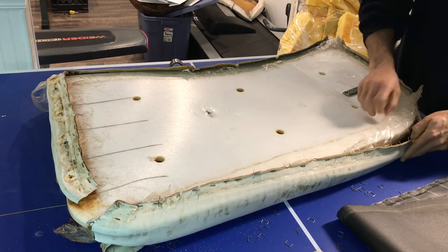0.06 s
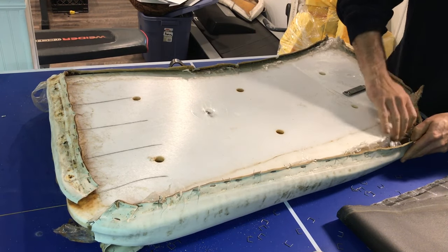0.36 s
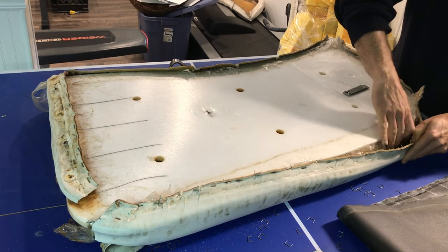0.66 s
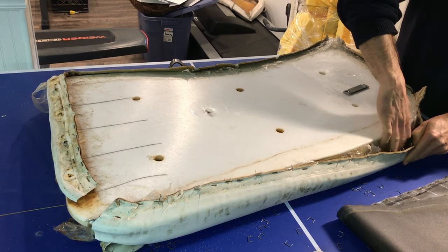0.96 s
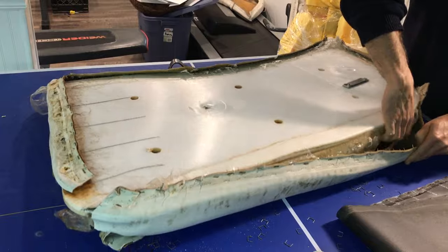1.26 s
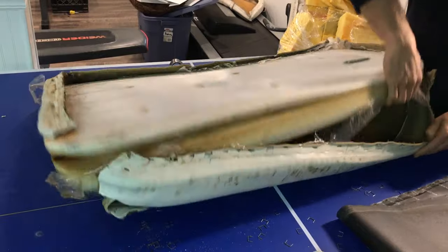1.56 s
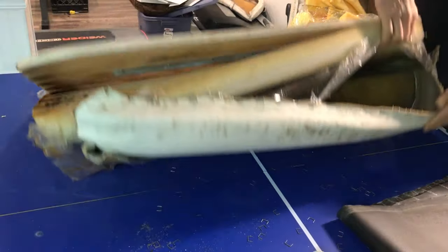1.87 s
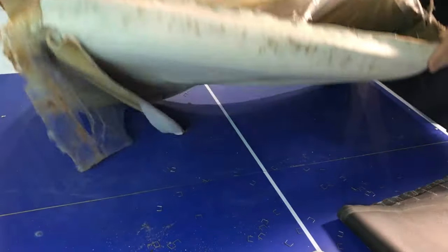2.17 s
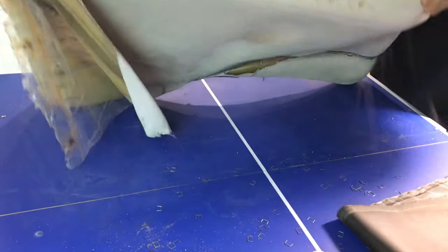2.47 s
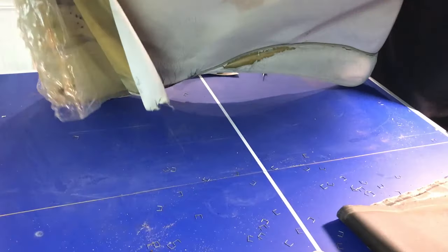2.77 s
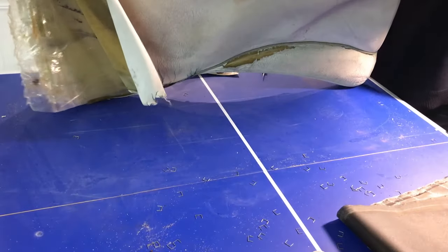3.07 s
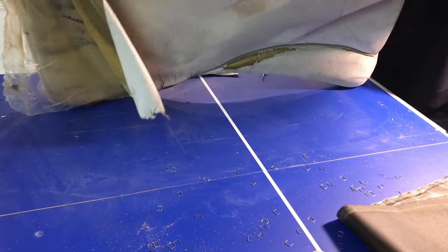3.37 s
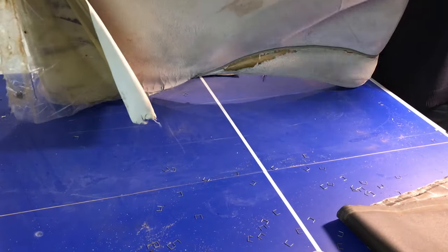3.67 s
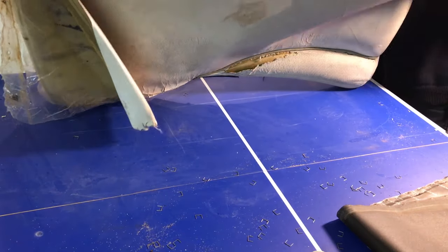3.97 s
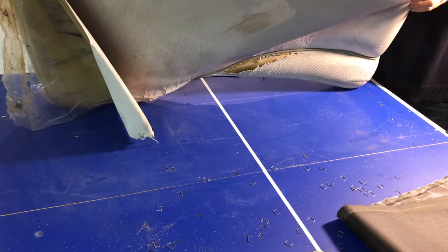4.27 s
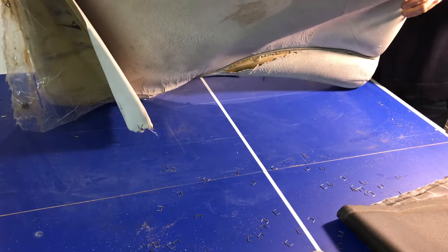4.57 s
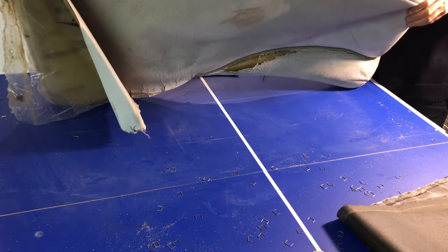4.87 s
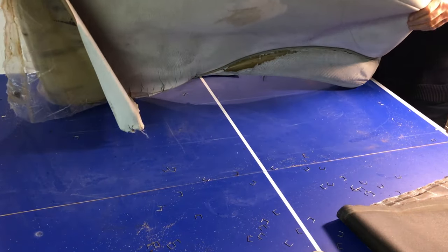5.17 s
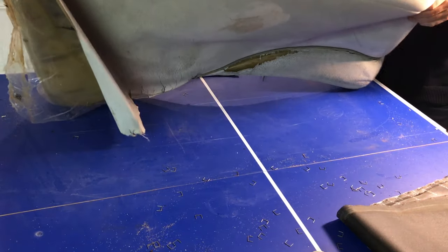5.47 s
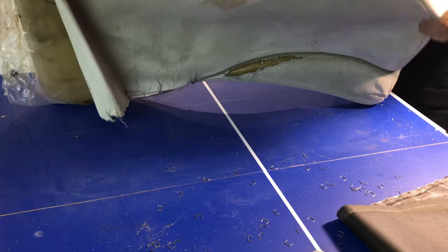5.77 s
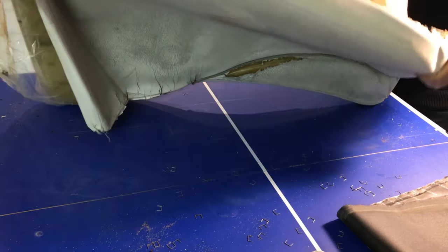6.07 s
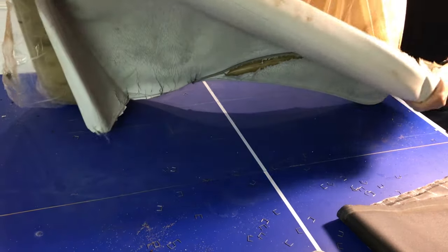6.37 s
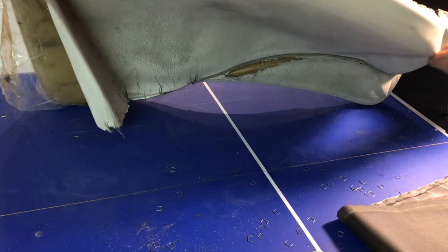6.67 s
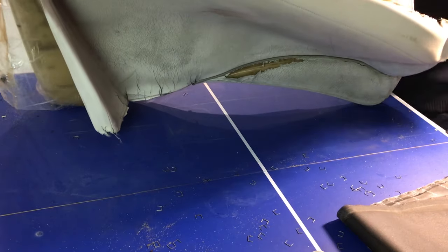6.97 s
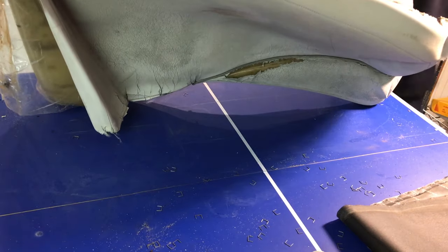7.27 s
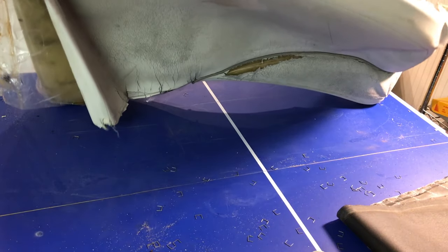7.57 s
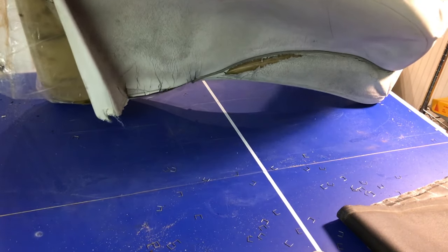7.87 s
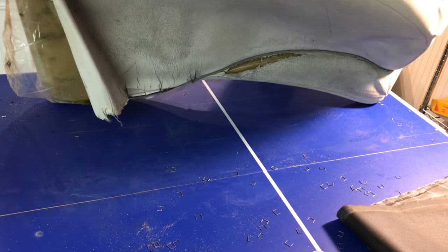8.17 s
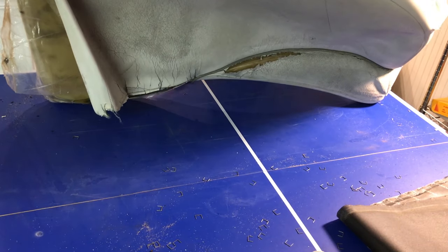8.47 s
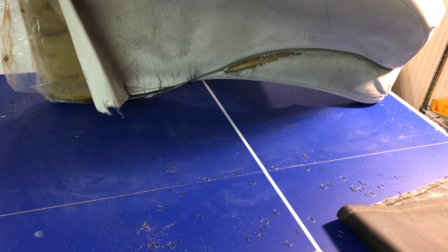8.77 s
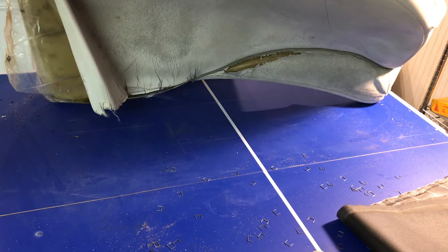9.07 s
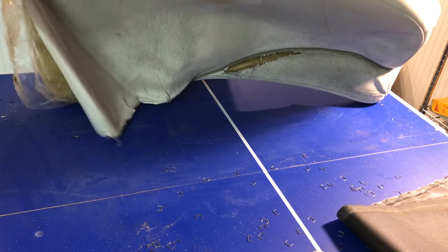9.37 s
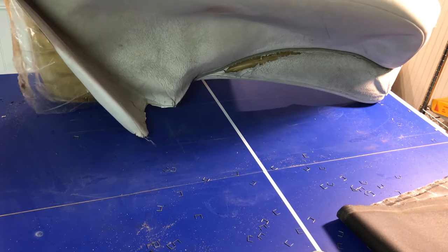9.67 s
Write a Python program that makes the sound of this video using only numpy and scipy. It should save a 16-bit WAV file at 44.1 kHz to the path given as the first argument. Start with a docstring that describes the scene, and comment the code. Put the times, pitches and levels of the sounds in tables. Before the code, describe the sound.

Close crinkling, dragging and short rips of a stiff vinyl cover being stripped from a foam cushion, bumping on a workshop table.

```python
"""A workshop table, one microphone close by: an old vinyl cover and its plastic lining come off a cushion.
Over a faint room hum the cover flexes and drags on the foam while the brittle lining crinkles and snaps.
From half a second on it rips loose in bursts and pops as it buckles; the cushion bumps the table and old
glue peels. At 3.5 s the stiff edge chatters on the table top; a swipe at 5.5 s leads to a loud crack.
Lighter crinkling and small rips follow, then a few more pops and a last swipe at 9.4 s."""
import sys
import numpy as np
from scipy import signal
from scipy.fft import rfft, irfft, next_fast_len
from scipy.io import wavfile
from scipy.ndimage import uniform_filter1d

SR = 44100
rng = np.random.default_rng(int(sys.argv[2]) if len(sys.argv) > 2 else 0)


def put_to_file(sound):
    """Save the sound as 16-bit audio at rate SR, in the file named by the first command-line argument."""
    columns = np.atleast_2d(sound).T  # one column per channel
    safe = np.clip(columns, -1, 1)
    whole_steps = np.round(safe * 32767)
    wavfile.write(sys.argv[1], SR, whole_steps.astype(np.int16))


N = 433503
TIME = np.arange(N) / SR

# the workshop's still air: (frequency [Hz], relative density [dB])
AIR_SPECTRUM = [(15, -51), (30, -25), (48, -1), (62, -4.5), (90, 1.5), (160, -4.5), (270, -7.5), (362, -6),
                (460, -13), (950, -13.5), (2200, -21.5), (3200, -20.5), (6000, -27), (16000, -27)]
# a machine in the background: (frequency [Hz], relative level [dB])
HUM_PARTIALS = [(53.8, -80), (102.3, -82), (156.1, -80), (209.9, -77), (360.7, -77.5)]
# hands pulling, in relative levels: (start [s], length [s], flexing [dB], dragging [dB], crinkling [dB])
PULLS = [(0.0, 0.0069, -59.5, -69, -57), (0.368, .015, -53.5, -61, -62.5), (0.463, 0.18, -52.5, -61, -60),
         (0.728, 0.27, -55, -57, -58), (1.004, 0.056, -50.5, -53, -53.5), (1.115, 0.071, -44, -49, -54.5),
         (1.245, 0.11, -45, -51, -53), (1.36, 0.066, -39, -49, -46), (1.458, 0.062, -39, -39, -40),
         (1.534, 0.13, -45, -45.5, -54.5), (1.752, 0.13, -44.5, -47.5, -54.5),
         (1.931, 0.2, -44.5, -44, -53), (2.158, 0.058, -40, -49, -46), (2.22, 0.35, -49, -48.5, -49.5),
         (2.582, 0.022, -42, -49, -52.5), (2.69, 0.14, -64, -56.5, -56.5), (2.833, 0.016, -53.5, -51, -51),
         (2.912, 0.039, -52, -46.5, -43.5), (3.002, 0.042, -61, -53.5, -49),
         (3.052, 0.08, -74, -56.5, -52.5), (3.243, 3.05, -68, -62.5, -64.5), (3.507, 0.03, -49, -53, -51),
         (3.584, 0.035, -49, -61, -48), (3.664, 0.07, -63, -58.5, -58), (3.976, 0.051, -61, -53, -58.5),
         (4.27, 0.017, -50, -54, -73), (4.56, 0.23, -48, -53.5, -59.5), (4.97, 0.014, -50, -50.5, -56.5),
         (5.02, 0.053, -42.5, -48, -60.5), (5.193, 0.032, -45.5, -48, -75), (5.26, 0.22, -53.5, -57, -82),
         (5.423, 0.057, -67, -49, -58), (5.538, 0.046, -56, -53, -45.5), (5.67, 0.07, -43.5, -44.5, -69),
         (5.82, 0.047, -34, -34.5, -47), (5.932, 0.24, -58, -46.5, -61.5),
         (6.106, 0.031, -48.5, -55.5, -54), (6.179, 0.023, -46.5, -42.5, -50),
         (6.448, 0.092, -56, -55, -61), (6.6, 0.22, -71, -62.5, -71), (7.194, 0.14, -82, -56, -61.5),
         (7.43, 1, -66.5, -58, -61), (7.509, 0.067, -66, -52, -57), (8.049, 0.15, -73, -59.5, -57),
         (8.25, 0.23, -74, -60.5, -56), (8.49, 0.61, -68, -62, -63), (9.146, 0.15, -49.5, -48.5, -52.5),
         (9.398, 0.13, -61, -48.5, -51), (9.447, 0.01, -68, -60, -64), (9.56, 0.075, -63, -59, -59),
         (9.673, 0.099, -74, -79, -62.5), (9.82, 0.022, -71, -52.5, -52)]
# the heavy cover folding: (frequency [Hz], relative density [dB])
FLEX_SPECTRUM = [(20, -50), (40, -34), (60, -10.5), (85, -1), (135, -4), (190, -4.5), (250, -5.5),
                 (330, -4), (550, -12), (800, -16), (1600, -50), (4000, -47)]
# the cushion resounding under the folds: (frequency [Hz], width [Hz], gain [dB])
CUSHION_MODES = [(336, 154, 3), (450, 100, -7.5), (548, 73, 3.5), (760, 160, -3), (897, 100, -2)]
# vinyl rubbing on foam: (frequency [Hz], relative density [dB])
DRAG_SPECTRUM = [(250, -14), (520, -2.5), (720, 0), (930, 2), (1400, -2.5), (1800, -2.5), (2300, -6.5),
                 (3100, -8.5), (4500, -22.5), (8000, -21), (16000, -22)]
# the brittle lining crackling: (frequency [Hz], relative density [dB])
CRINKLE_SPECTRUM = [(1200, -25), (2400, 0), (3700, 1.5), (6000, -0.5), (8500, -2), (10500, -5),
                    (13000, -3.5), (16000, -13.5)]
# creases of the lining snapping over: (time [s], level [dB], pitch [Hz])
CREASE_SNAPS = [(.033, -62, 5130), (.125, -64, 9000), (.208, -62, 7640), (.323, -59, 4550),
                (.347, -59, 3250), (.374, -59, 7000), (.381, -64, 8040), (.463, -60.5, 3800),
                (.513, -55.5, 5800), (.619, -57, 5000), (.635, -57, 3900), (.68, -55, 9000),
                (.756, -53, 5620), (.849, -54, 7500), (.88, -56, 7400), (0.898, -56, 4650),
                (.944, -65, 7300), (0.98, -47.5, 4300), (.997, -77, 6000), (1.002, -49.5, 5600),
                (1.043, -47.5, 4580), (1.049, -56, 4500), (1.116, -48, 3980), (1.16, -49, 4180),
                (1.161, -49, 4400), (1.184, -51, 3800), (1.218, -43.5, 3800), (1.34, -42.5, 6300),
                (1.5035, -38, 6000), (1.5108, -38, 8100), (1.5159, -36.5, 6500), (1.523, -36, 5900),
                (1.781, -51, 2800), (1.811, -57, 2800), (1.884, -55, 4500), (1.898, -63, 5500),
                (2.005, -50, 3660), (2.142, -39, 6400), (2.423, -55, 4500), (2.535, -48, 5300),
                (2.57, -49, 4230), (2.581, -41, 3980), (2.899, -29, 6640), (2.9268, -39, 7800),
                (2.931, -36, 7000), (2.9345, -36, 7500), (2.963, -44, 6950), (3.003, -39.5, 7800),
                (3.013, -40, 7900), (3.026, -47, 7000), (3.065, -52, 7540), (3.09, -49, 6370),
                (3.169, -50.5, 7700), (3.414, -56, 5940), (3.59, -37, 4030), (3.850, -48.5, 6300),
                (3.951, -41, 7750), (4.087, -50.5, 8250), (4.189, -62.5, 6600), (4.215, -53.5, 3140),
                (4.2586, -56.5, 5600), (4.286, -59, 6000), (4.383, -53.5, 8600), (4.414, -46.5, 8900),
                (4.517, -57, 8900), (4.529, -52, 8800), (4.672, -38, 5540), (4.763, -61, 4520),
                (4.7735, -54, 8700), (4.7942, -55, 7100), (4.815, -55.5, 9000), (4.892, -73, 6300),
                (5.071, -54.5, 6000), (5.1753, -46.5, 5450), (5.363, -57.5, 5000), (5.306, -56, 8160),
                (5.706, -49, 5260), (6.011, -39.5, 8000), (6.065, -44, 5000), (6.18, -61.5, 7040),
                (6.188, -49, 4000), (6.217, -45.5, 4080), (6.228, -40.5, 12100), (6.339, -52, 3400),
                (6.431, -58, 8600), (6.444, -55.5, 4200), (6.891, -66.5, 7000), (6.922, -65, 3380),
                (7.008, -62, 8660), (7.057, -68, 8000), (7.067, -68, 6000), (7.091, -72, 6500),
                (7.16, -68, 6000), (7.215, -56, 6600), (7.259, -63, 11000), (7.311, -56, 5000),
                (7.327, -58, 9000), (7.58, -53, 5500), (7.734, -53, 3300), (7.923, -52, 8800),
                (7.947, -53, 10900), (8.121, -48, 11000), (8.316, -54, 5600), (8.332, -58, 6100),
                (8.45, -55, 8800), (8.755, -64, 9300), (8.907, -57, 11600), (9.285, -49.5, 3200),
                (9.468, -39.5, 7340), (9.49, -43.5, 8500), (9.543, -35, 7900), (9.6, -39.5, 8700),
                (9.619, -46, 8140), (9.630, -44.5, 7970), (9.701, -48.5, 8050), (9.757, -53, 8300)]
# cover and lining ripping loose: (time [s], length [s], level [dB], dull above [Hz])
RIPS = [(0.461, 0.0028, -52, 8900), (0.526, 0.0088, -50.5, 12000), (1.371, 0.01, -40, 2400),
        (1.385, 0.01, -37.5, 2400), (1.405, 0.017, -42, 2980), (1.471, 0.014, -38.5, 3500),
        (1.508, 0.016, -30, 18000), (2.138, 0.04, -43.5, 6960), (3.568, 0.045, -52, 6500),
        (4.665, 0.0028, -47.5, 14000), (5.789, 0.042, -40, 3950), (6.064, 0.0064, -43.5, 5000),
        (6.178, 0.012, -37.5, 9000), (6.213, 0.02, -46.5, 6940), (7.235, 0.015, -53, 12000),
        (7.559, 0.02, -54, 9000), (7.714, 0.091, -54, 14000), (7.865, 0.035, -53, 12100),
        (7.932, 0.034, -53, 14000), (8.061, 0.054, -53.5, 14000), (8.171, 0.04, -55, 14000),
        (9.12, 0.017, -43.5, 2480)]
# the vinyl buckling: (time [s], level [dB], lower ring [Hz], upper ring [Hz], upper against lower [dB])
BUCKLE_POPS = [(.621, -50, 486, 600, -8), (.979, -46.5, 417, 560, -14), (1.042, -45, 445, 600, -22),
               (1.343, -40.5, 600, 1500, 0), (1.372, -44, 420, 520, 0), (1.387, -43, 400, 610, 0),
               (1.409, -40, 480, 634, 4), (1.419, -37.5, 380, 606, 14), (1.503, -33, 620, 1500, -3),
               (1.513, -35, 720, 1540, 6), (1.529, -34, 492, 740, -3), (1.858, -40, 705, 990, 1),
               (2.155, -44, 516, 1100, -8), (2.581, -47, 700, 950, -6), (4.216, -52, 714, 1510, -5),
               (4.671, -35, 880, 1520, 0), (5.016, -49, 700, 1200, -3), (5.033, -42, 750, 1300, 1),
               (5.174, -39, 744, 1500, -12), (5.179, -34, 720, 880, -1), (5.362, -44.5, 534, 1270, -4),
               (5.669, -34, 640, 1270, -2), (5.726, -37, 600, 1290, -1.5), (5.789, -43, 600, 1100, -3),
               (5.879, -29, 900, 1400, 0), (5.995, -38, 700, 1200, 3), (6.065, -34.5, 1160, 1490, -2),
               (6.074, -35, 650, 1000, -3), (6.126, -45, 640, 1200, 2), (6.183, -38.5, 610, 1090, -7),
               (9.123, -44.5, 690, 1370, 3), (9.137, -41, 697, 810, -8), (9.207, -45.5, 644, 1370, -2),
               (9.247, -50, 650, 1000, -5)]
# the cushion bumping the table: (time [s], level [dB], pitch [Hz])
CUSHION_BUMPS = [(1.372, -38.5, 424), (1.387, -37, 474), (1.513, -35.5, 474), (1.529, -37.5, 330),
                 (1.781, -46, 290), (1.798, -45, 172), (1.816, -43, 103), (1.862, -41, 300),
                 (2.191, -46, 340), (2.6, -47.5, 324), (2.834, -37.5, 330), (3.232, -54.5, 333),
                 (3.592, -43.5, 310), (4.265, -51, 355), (4.62, -47.5, 340), (4.667, -42, 337),
                 (4.698, -44.5, 330), (4.984, -45.5, 190), (5.013, -40.5, 208), (5.03, -41, 280),
                 (5.177, -39.5, 368), (5.181, -46.5, 110), (5.367, -44, 433), (5.79, -41, 262),
                 (5.83, -35, 332), (5.844, -35.5, 378), (5.859, -36, 446), (5.859, -45, 89),
                 (6.069, -37.5, 333), (6.125, -45, 328), (9.284, -37.5, 310)]
# the cover peeling off the foam: (start [s], length [s], level [dB])
PEELS = [(1.57, 0.075, -55.5), (1.82, 0.36, -57), (2.3, 0.21, -59.5)]
# the stiff edge knocking on the table: (time [s], level [dB])
EDGE_KNOCKS = [(3.46, -49.5), (3.507, -37.5), (3.532, -38), (3.543, -34), (3.589, -36.5)]
# resonances of that edge: (frequency [Hz], width [Hz], gain [dB])
EDGE_MODES = [(310, 86, -8), (600, 89, 7), (784, 130, 5), (1290, 180, -3.5), (1850, 180, 2),
              (2950, 260, -3), (3750, 600, -8.5), (4640, 500, -11)]
# the cover sliding off the foam in smooth swipes: (start [s], length [s], level [dB])
SWIPES = [(5.478, 0.14, -43), (9.391, 0.037, -48.5)]
# the hiss of a swipe: (frequency [Hz], relative density [dB])
SWIPE_SPECTRUM = [(500, -6.5), (950, -3), (1400, 3), (1900, 5), (2400, 3), (3100, -4.5), (4500, 0),
                  (6000, -1.5), (8000, -4), (11500, -1.5), (16000, -12)]
# colour of the room's echoes, also given to the crack: (frequency [Hz], width [Hz], gain [dB])
WALL_PEAKS = [(1450, 330, 1), (2250, 310, -2.5), (3570, 1400, 4), (6200, 670, 3)]
# the workshop's reverberation: (frequency [Hz], time to fall 60 dB [s])
ROOM_T60 = [(150, 0.95), (400, 0.76), (1000, 0.93), (3500, 0.78), (6500, 0.84), (10000, 0.58),
            (15000, 0.41)]

PULL_ATTACK_S, PULL_RELEASE_DB_PER_S = 0.042, 143.5   # the sheet tightens, is held, then settles
FLEX_RELEASE_DB_PER_S = 202   # the foam stills the heavy folds sooner
SWIPE_ATTACK_S, SWIPE_RELEASE_DB_PER_S = 0.033, 199


def from_db(db):
    """Decibels to gain."""
    return 10 ** (np.asarray(db) / 20)


def rms_one(x):
    """Scale to an rms of 1."""
    return x / np.sqrt(np.mean(x ** 2) + 1e-20)


def at_hz(points, hz):
    """Read a table along a log-frequency axis."""
    known_hz, values = np.transpose(points)
    return np.interp(np.log(np.maximum(hz, 1)), np.log(known_hz), values)


def coloured(x, spectrum):
    """Give a long signal a spectrum; rms 1."""
    size = next_fast_len(N)
    gain = from_db(at_hz(spectrum, np.fft.rfftfreq(size, 1 / SR)))
    return rms_one(irfft(rfft(x, size) * gain, size)[:N])


def cut(x, hz, kind, order=2):
    """Butterworth low- or high-pass."""
    return signal.sosfilt(signal.butter(order, min(hz, .45 * SR), kind, fs=SR, output="sos"), x)


def resonate(x, hz, width_hz):
    """One resonance with gain 1 at its top."""
    radius = np.exp(-np.pi * width_hz / SR)
    feedback = [1, -2 * radius * np.cos(2 * np.pi * hz / SR), radius ** 2]
    return signal.lfilter(np.array([1, 0, -1]) * (1 - radius ** 2) / 2, feedback, x)


def body(x, modes):
    """Parallel resonances of alternating sign."""
    return sum((-1) ** k * from_db(db) * resonate(x, hz, width)
               for k, (hz, width, db) in enumerate(modes))


def tinted(x, peaks):
    """A chain of peaks and dips."""
    for hz, width, db in peaks:
        x = x + (from_db(db) - 1) * resonate(x, hz, width)
    return x


def drift(per_s):
    """A random wander with an rms of 1."""
    knots = rng.standard_normal(int(N / SR * per_s) + 2)
    return rms_one(np.interp(TIME * per_s, np.arange(len(knots)), knots))


def burst(t60, size=8192):
    """A puff of noise that falls 60 dB in t60 seconds."""
    return rng.standard_normal(size) * from_db(-60 * np.minimum(TIME[:size] / t60, 4))


def slips(per_s, spread_db, size=N):
    """Random stick-slip impulses, a few large among many small; rms 1 at any rate."""
    chance = np.clip(per_s / SR, 1e-4, 1)
    strength = from_db(spread_db * np.minimum(rng.exponential(1, size), 4))
    slipping = rng.random(size) < chance
    return rms_one(slipping * strength * rng.choice([-1, 1], size) / np.sqrt(chance))


def add(out, time_s, sound, db):
    """Mix a sound in, its loudest 4 ms at the given level."""
    start = round(time_s * SR)
    loudest = np.sqrt(uniform_filter1d(sound ** 2, round(.004 * SR), mode="constant").max())
    out[start:start + len(sound)] += (from_db(db) / loudest * sound)[:N - start]


def effort(moves, attack_s, release_db_per_s):
    """Level in dB of (start, length, level) moves: each swells, holds and dies away; their powers add."""
    power = np.full(N, 1e-12)
    for start, length, db in moves:
        span = slice(*np.searchsorted(TIME, [start - attack_s, start + length + 1]))
        swell = np.clip(1 + (TIME[span] - start) / attack_s, 0, 1)
        fall_db = release_db_per_s * np.maximum(TIME[span] - start - length, 0)
        power[span] += (swell * from_db(db - fall_db)) ** 2
    return 10 * np.log10(power)


def room_tone(air_db, hum_gain_db):
    """Behind everything, the workshop's still air and a slightly wavering machine hum."""
    hum = sum(from_db(db) * np.sqrt(2) * np.sin(2 * np.pi * hz * TIME + .5 * drift(5.3))
              for hz, db in HUM_PARTIALS)
    air = coloured(rng.standard_normal(N), AIR_SPECTRUM)
    return from_db(air_db) * air + from_db(hum_gain_db) * hum


def flexing(level_db):
    """The heavy cover folds over and over, and the cushion resounds under it."""
    folds = slips(2200, spread_db=3) * from_db(1.4 * drift(30))
    cover = coloured(folds, FLEX_SPECTRUM)
    cushion = from_db(-2) * rms_one(body(folds, CUSHION_MODES))
    return from_db(level_db - 6) * rms_one(cut(cover + cushion, 36, "high"))


def dragging(level_db):
    """Vinyl drags over foam in fine, uneven slips; a light touch sounds thin, a heavy one full."""
    grains = coloured(slips(6000, spread_db=2.5) * from_db(1.86 * drift(50)), DRAG_SPECTRUM)
    pressure = np.clip((level_db + 58) / 10, 0, 1)
    lows = cut(grains, 720, "low", order=1)
    return from_db(level_db - 8) * rms_one(grains - (1 - pressure) * lows)


def crinkling(level_db):
    """Moved slowly, the lining gives separate crackles; fast sliding packs them into a hiss."""
    crackles_per_s = 1100 * from_db(level_db + 60) ** 1.5
    crackles = slips(crackles_per_s, spread_db=3)
    flicker = from_db(2.2 * drift(110) + 1.5 * drift(22))
    return from_db(level_db - 4.5) * coloured(crackles * flicker, CRINKLE_SPECTRUM)


def snaps():
    """A crease flips with a dry, bright click, its small facet rings, and the film around it shivers."""
    out = np.zeros(N)
    for time_s, db, hz in CREASE_SNAPS:
        flip = burst(t60=.0028)
        facet = cut(resonate(flip, hz, width_hz=.6 * hz), .5 * hz, "high")
        click = from_db(-7.5) * cut(cut(flip, .4 * hz, "high", order=1), 2 * hz, "low")
        shiver = from_db(-19) * resonate(burst(t60=.069), hz=5530, width_hz=3600)
        add(out, time_s, cut(facet + shiver, 1.6 * hz, "low") + click, db)
    return out


def rips(t60=.033):
    """Threads and old glue give way in a quick run of tiny breaks."""
    out = np.zeros(N)
    for time_s, length, db, dull_hz in RIPS:
        breaks = slips(4500, spread_db=4.4, size=8192)
        dying = from_db(-60 * np.maximum(TIME[:len(breaks)] - length, 0) / t60)
        rip = cut(breaks * dying, dull_hz, "low", order=1)
        add(out, time_s, cut(rip, 310, "high"), db)
    return out


def pops(rasp_t60=.043, dull_hz=2060):
    """A fold of stiff vinyl buckles with a dull flap and rings hollowly at two pitches of its own."""
    out = np.zeros(N)
    for time_s, db, lower_hz, upper_hz, upper_db in BUCKLE_POPS:
        rasp = burst(rasp_t60)
        jolt = signal.unit_impulse(len(rasp)) + from_db(-5) * rasp / np.linalg.norm(rasp)
        lower = rms_one(resonate(jolt, lower_hz, width_hz=83))
        upper = rms_one(resonate(jolt, upper_hz, width_hz=125))
        flap = rms_one(cut(cut(burst(rasp_t60), 2 * upper_hz, "low"), lower_hz, "high"))
        fold = lower + from_db(upper_db) * upper + from_db(-2) * flap
        add(out, time_s, cut(fold, dull_hz, "low"), db)
    return out


def bumps():
    """The cushion meets the table; its foam softens each bump to a few low cycles."""
    out = np.zeros(N)
    for time_s, db, hz in CUSHION_BUMPS:
        width_hz = .4 * hz
        thud = resonate(burst(t60=.047), hz, width_hz)
        add(out, time_s, resonate(thud, hz, width_hz), db)
    return out


def peeling(start_hz=748, sag_hz_per_s=140, width_hz=48):
    """Old glue lets go in a run of slips; the freed panel drones on a note that sinks as it lengthens."""
    hz = start_hz - sag_hz_per_s * np.clip(TIME - PEELS[0][0], 0, 2)
    carrier = np.exp(2j * np.pi * np.cumsum(hz) / SR)
    # shifting down, low-passing and shifting back makes a resonance that follows the note
    baseband = cut(slips(2000, spread_db=1) / carrier, width_hz / 2, "low", order=1)
    drone = rms_one(np.real(carrier * baseband))
    return drone * from_db(effort(PEELS, PULL_ATTACK_S, PULL_RELEASE_DB_PER_S))


def knocks(attack_s=.001):
    """The stiff edge chatters on the table top, each touch a short, dry rasp."""
    out = np.zeros(N)
    for time_s, db in EDGE_KNOCKS:
        rasp = burst(t60=.019) + from_db(-12) * burst(t60=.04)
        rasp *= np.minimum(TIME[:len(rasp)] / attack_s, 1)
        knock = tinted(body(rasp, EDGE_MODES), [(2320, 360, -20)])   # a notch between two modes
        add(out, time_s, knock, db)
    return out


def swipes(bright_hz=9030, dulling_per_s=6.6, size=24000):
    """In a fast pull the slips merge into a swish, made hollow by an echo in the widening fold."""
    out, t = np.zeros(N), TIME[:size]
    sinking_hz = bright_hz * np.exp(-dulling_per_s * t)   # the treble band sinks as the slide slows
    carrier = np.cos(2 * np.pi * np.cumsum(sinking_hz) / SR)
    echo_delay_s = .0013 * (1 + 2.27 * t)
    for start, _, _ in SWIPES:
        hiss = coloured(rng.standard_normal(N), SWIPE_SPECTRUM)[:size]
        treble = rms_one(cut(rng.standard_normal(size), 1200, "low") * carrier)
        rub = hiss + from_db(-9) * treble
        echo = from_db(-7.5) * np.interp(t - echo_delay_s, t, rub)
        first = round((start - SWIPE_ATTACK_S) * SR)
        out[first:first + size] += rms_one(rub + echo)[:N - first]
    return out * from_db(effort(SWIPES, SWIPE_ATTACK_S, SWIPE_RELEASE_DB_PER_S))


def crack(time_s, db):
    """A taut spot of the cover gives way at once, with a sharp, broad report and a hollow ring."""
    out = np.zeros(N)
    report = burst(t60=.003) + from_db(-14) * burst(t60=.055)
    report = cut(cut(report, 13900, "low", order=1), 400, "high", order=1)
    hollow = from_db(-5) * resonate(burst(t60=.067), hz=1000, width_hz=770)
    add(out, time_s, tinted(report + hollow, WALL_PEAKS), db)
    return out


def table_echoes(x, gap_s=.001, size=8192):
    """Quick echoes off the table and cushion reach the microphone just behind the direct sound."""
    response = rms_one(burst(t60=.1, size=size) * (TIME[:size] > gap_s)) / np.sqrt(size)
    return signal.fftconvolve(x, response)[:N]


def workshop_reverb(x, build_s=.01):
    """The cluttered room stores sound in each band and returns it as a wash, shortest in the top treble."""
    out, white = np.zeros(N), rng.standard_normal((2, N))
    edges_hz = np.geomspace(60, 17000, 19)
    build = np.exp(-1 / (build_s * SR))
    for k, (low, high) in enumerate(zip(edges_hz, edges_hz[1:])):
        band = signal.butter(2, [low, high], "band", fs=SR, output="sos")
        t60 = at_hz(ROOM_T60, np.sqrt(low * high))
        keep = from_db(-60 / (t60 * SR)) ** 2   # share of the power left after one sample
        power = signal.sosfilt(band, x) ** 2
        stored = signal.lfilter([(1 - keep) * (1 - build)], np.convolve([1, -keep], [1, -build]), power)
        wash = rms_one(signal.sosfilt(band, white[k % 2]))
        out += np.sqrt(t60 * np.maximum(stored, 0)) * wash
    return out


def scene():
    """At the microphone, in mono: the handling up close, the table's echoes, then the room beyond."""
    start, length, flex, drag, crinkle = np.transpose(PULLS)
    flex_db = effort(zip(start, length, flex), PULL_ATTACK_S, FLEX_RELEASE_DB_PER_S)
    drag_db = effort(zip(start, length, drag), PULL_ATTACK_S, PULL_RELEASE_DB_PER_S)
    crinkle_db = effort(zip(start, length, crinkle), PULL_ATTACK_S, PULL_RELEASE_DB_PER_S)
    rustle = flexing(flex_db) + dragging(drag_db) + crinkling(crinkle_db) + peeling() + swipes()
    blows = pops() + knocks() + bumps()
    breaks = snaps() + rips() + crack(time_s=5.8777, db=-21)
    direct = rustle + blows + breaks
    near = table_echoes(from_db(-8.5) * direct)
    # blows at the table's near edge are a little drier
    far = workshop_reverb(from_db(-9) * rustle + from_db(-10) * blows + from_db(-9.5) * breaks)
    return (direct + tinted(near + far, WALL_PEAKS) + room_tone(air_db=-66.5, hum_gain_db=2))[None]


def record(dry):
    """The microphone's signal is cut steeply above 16 kHz."""
    return signal.sosfilt(signal.ellip(10, .2, 80, 16000, fs=SR, output="sos"), dry)


dry = scene()
out = record(dry)
put_to_file(out)
```